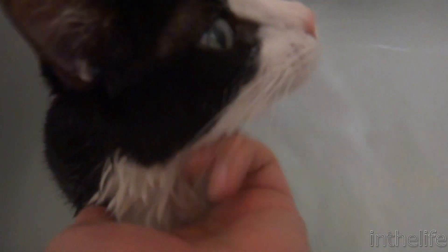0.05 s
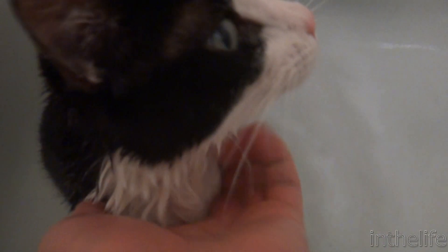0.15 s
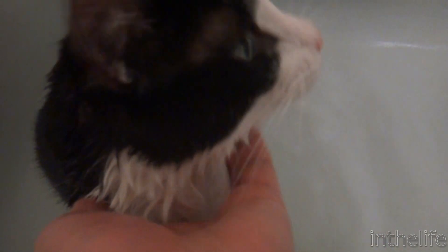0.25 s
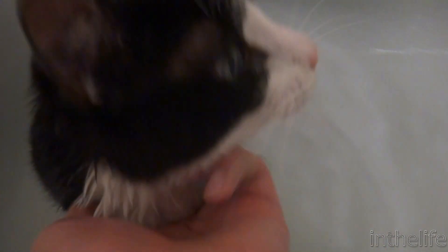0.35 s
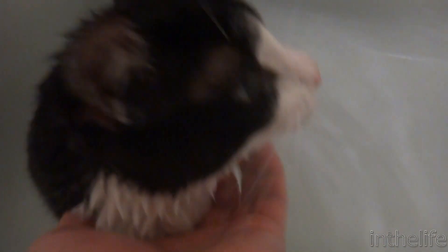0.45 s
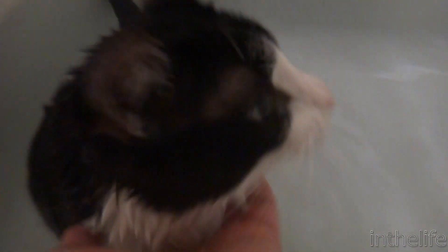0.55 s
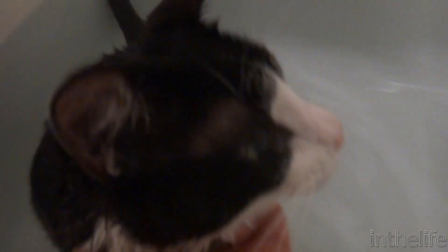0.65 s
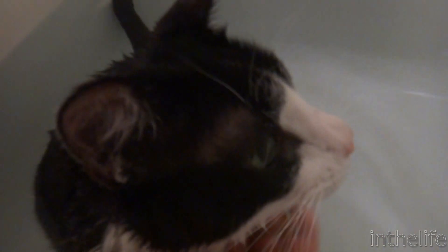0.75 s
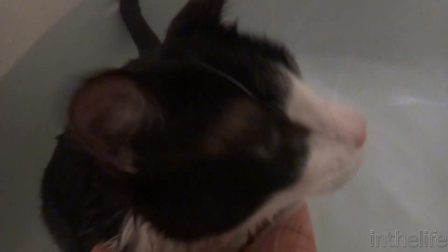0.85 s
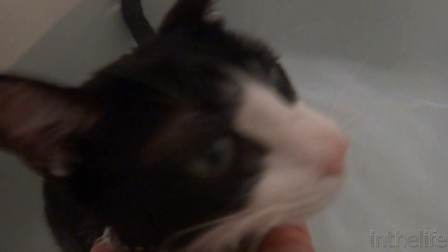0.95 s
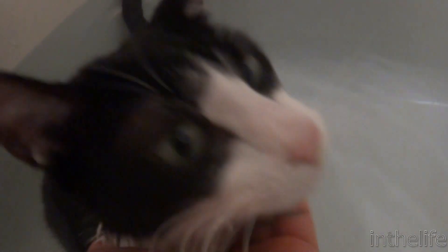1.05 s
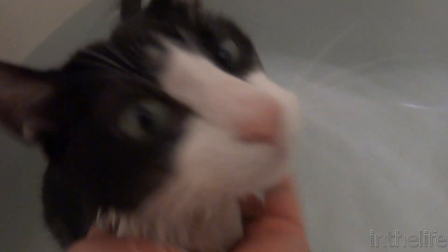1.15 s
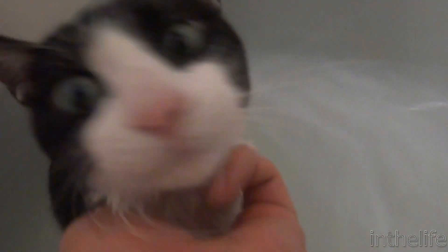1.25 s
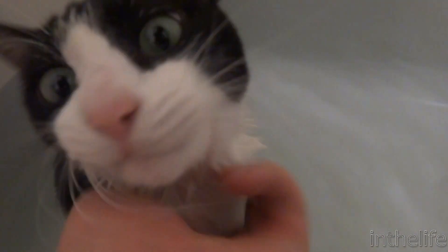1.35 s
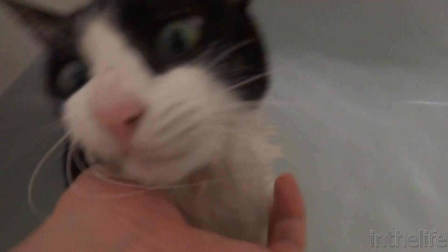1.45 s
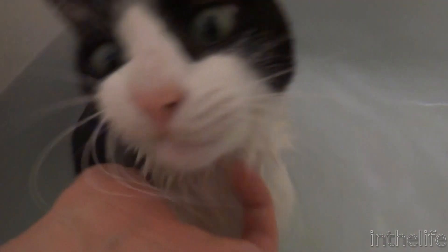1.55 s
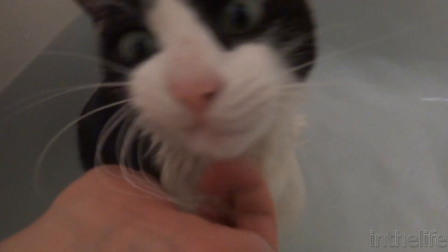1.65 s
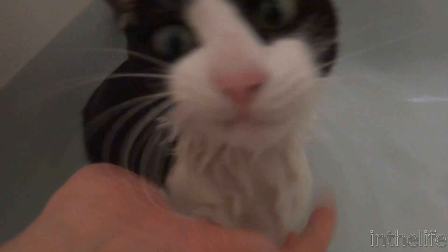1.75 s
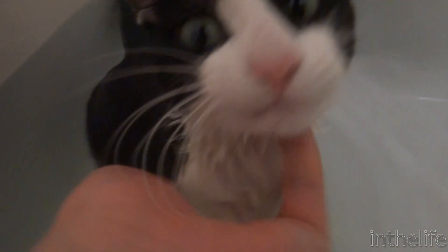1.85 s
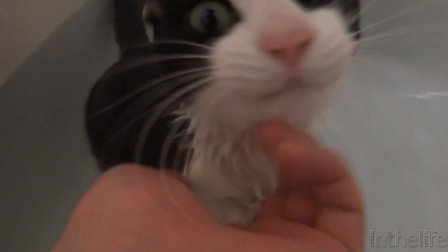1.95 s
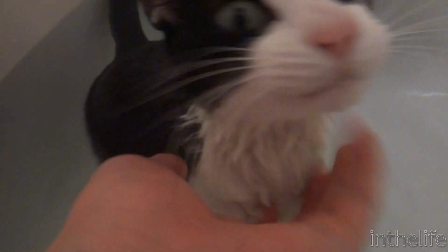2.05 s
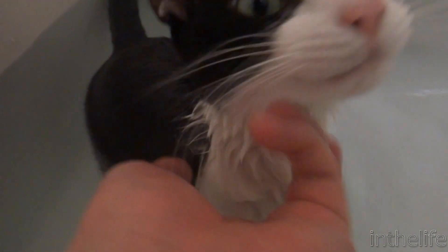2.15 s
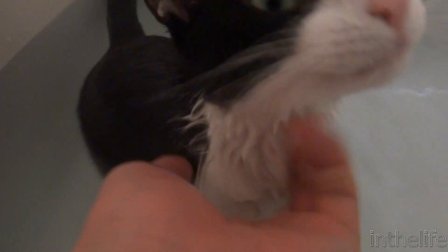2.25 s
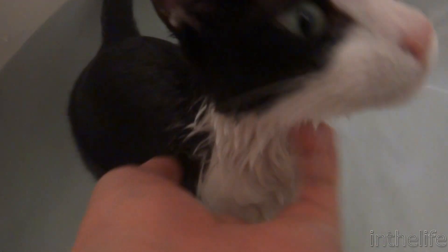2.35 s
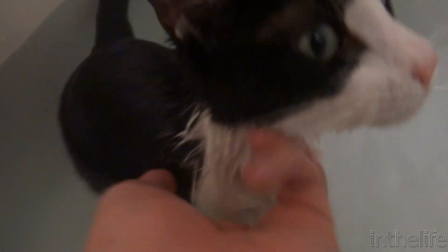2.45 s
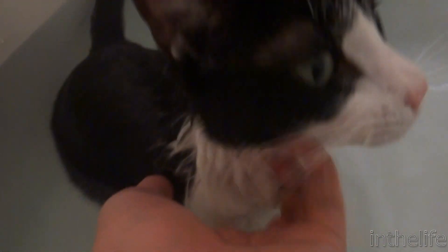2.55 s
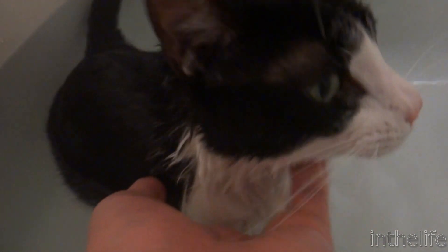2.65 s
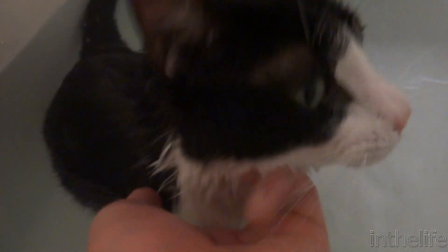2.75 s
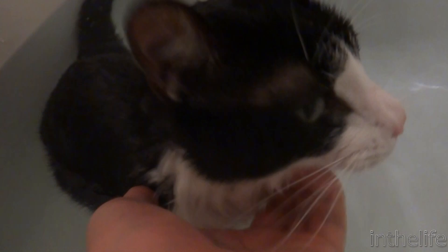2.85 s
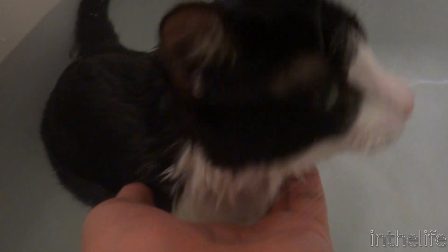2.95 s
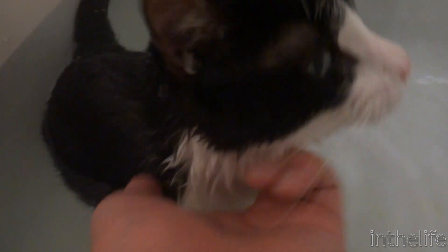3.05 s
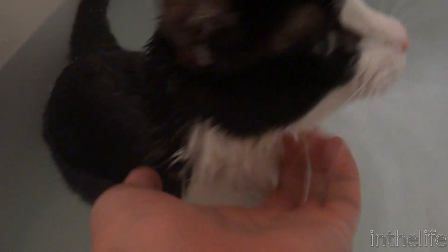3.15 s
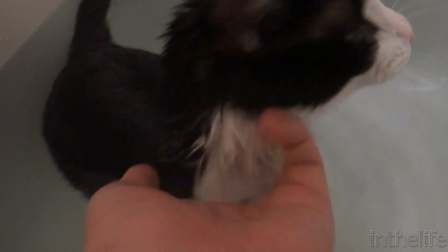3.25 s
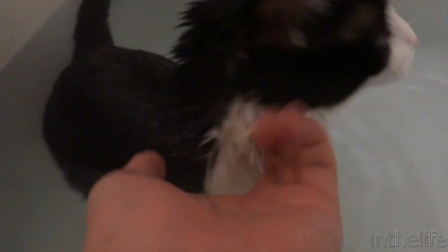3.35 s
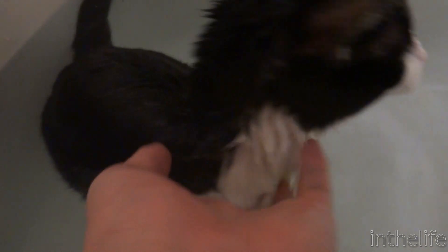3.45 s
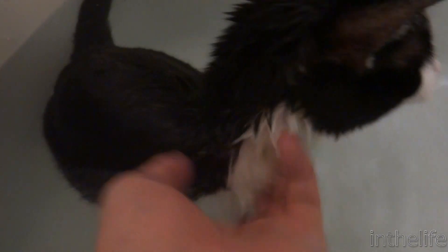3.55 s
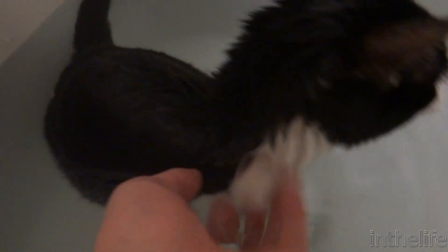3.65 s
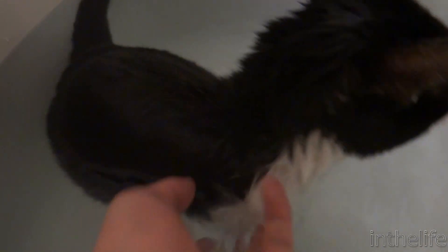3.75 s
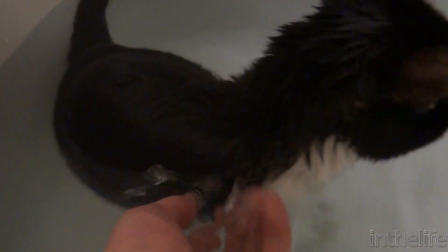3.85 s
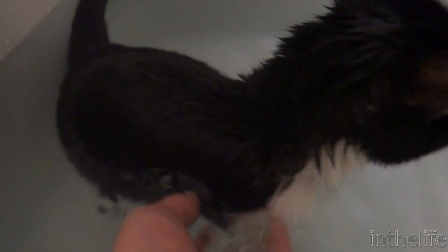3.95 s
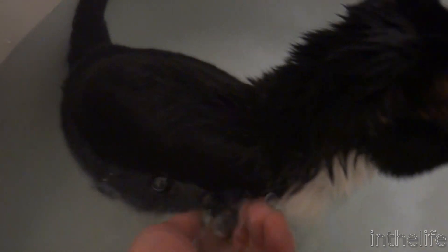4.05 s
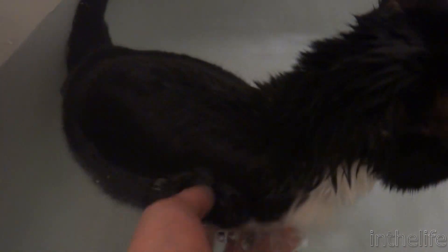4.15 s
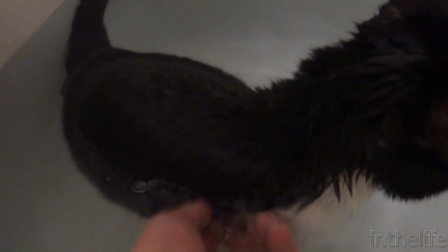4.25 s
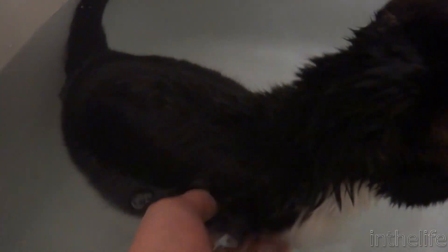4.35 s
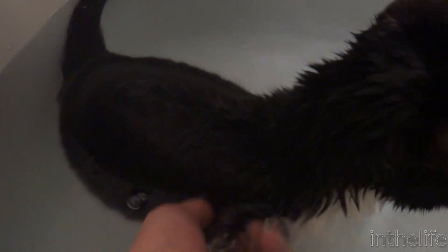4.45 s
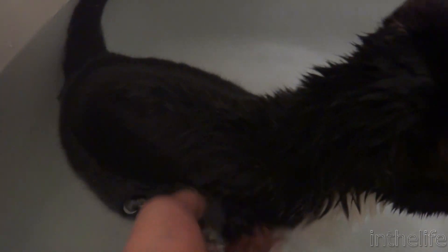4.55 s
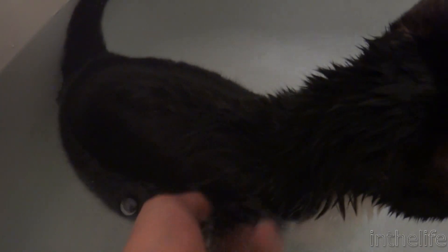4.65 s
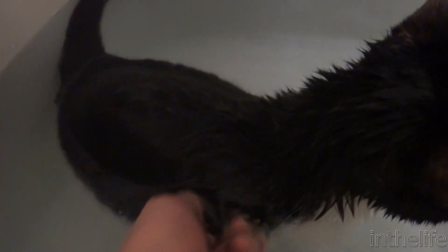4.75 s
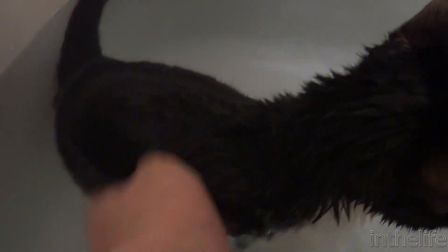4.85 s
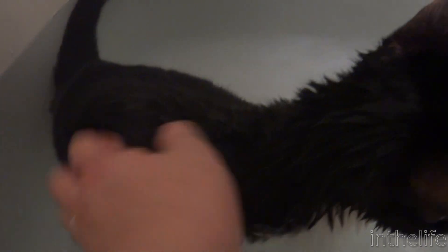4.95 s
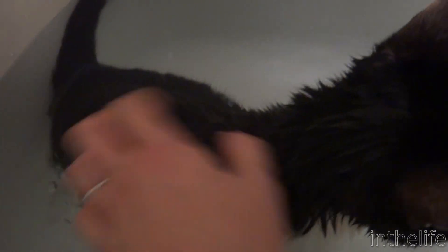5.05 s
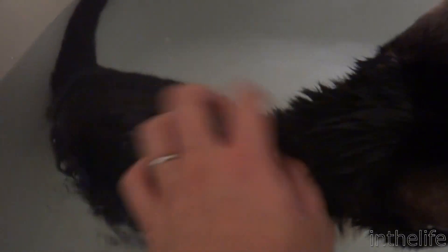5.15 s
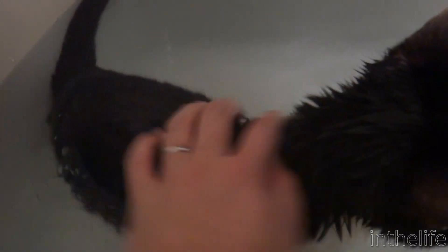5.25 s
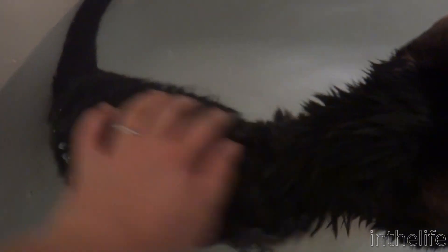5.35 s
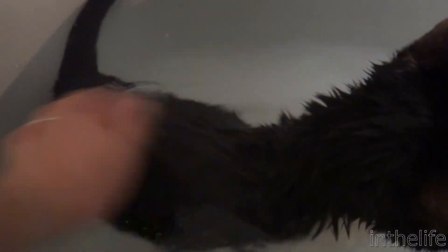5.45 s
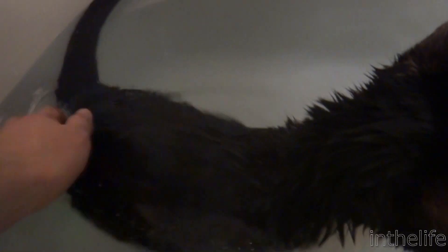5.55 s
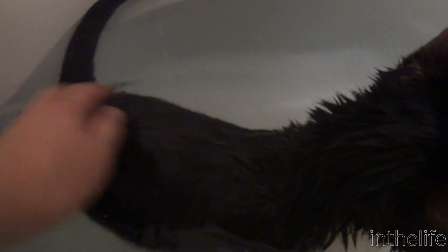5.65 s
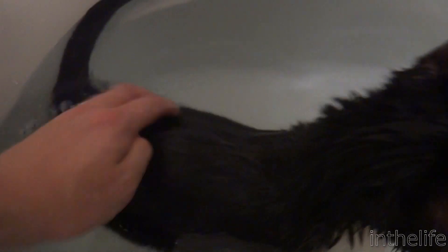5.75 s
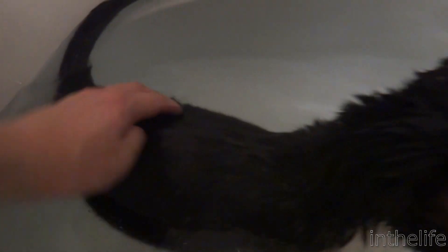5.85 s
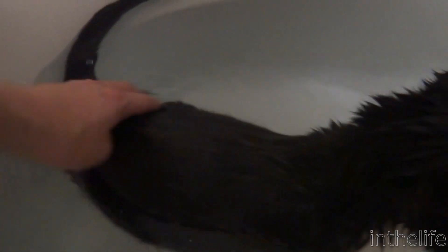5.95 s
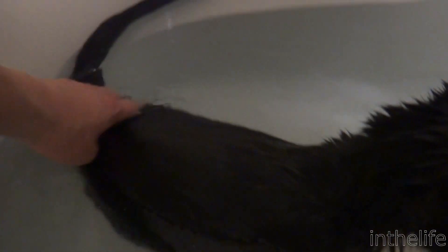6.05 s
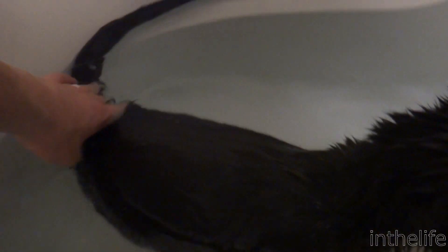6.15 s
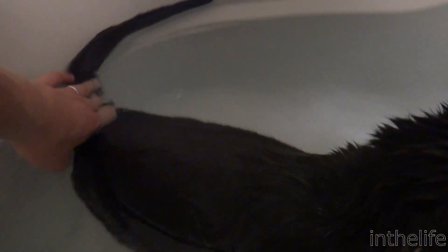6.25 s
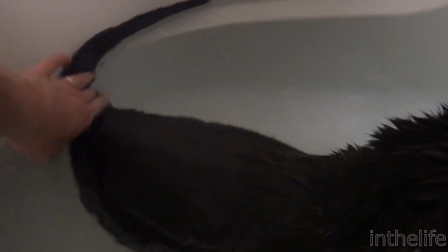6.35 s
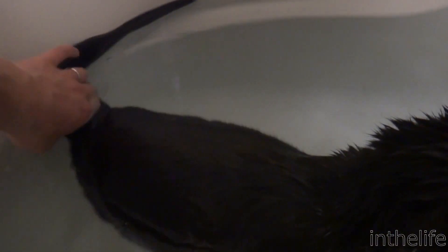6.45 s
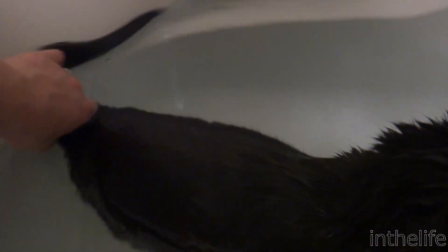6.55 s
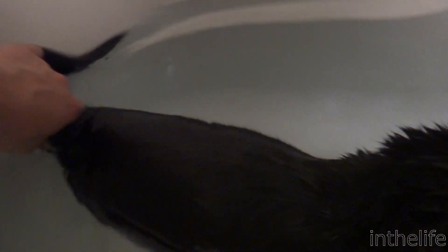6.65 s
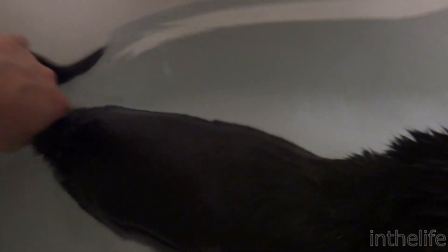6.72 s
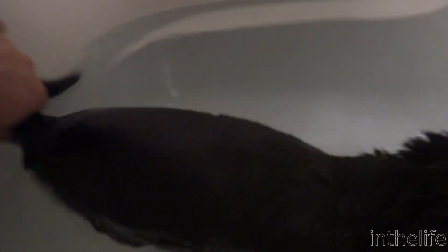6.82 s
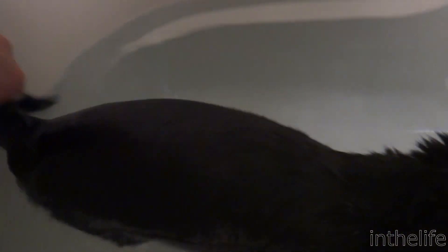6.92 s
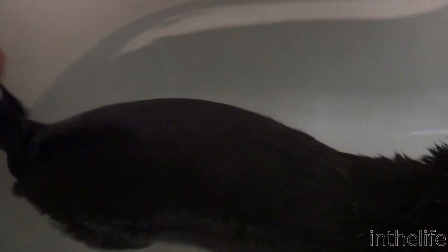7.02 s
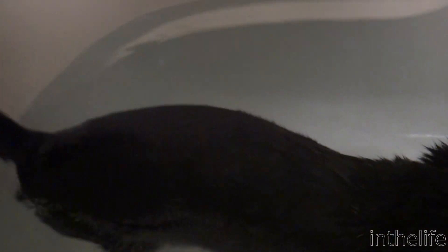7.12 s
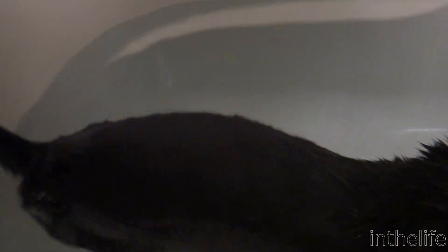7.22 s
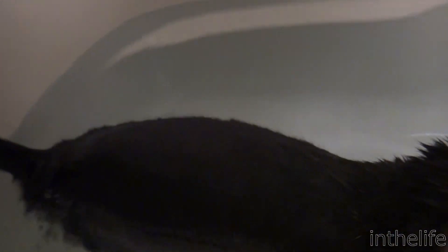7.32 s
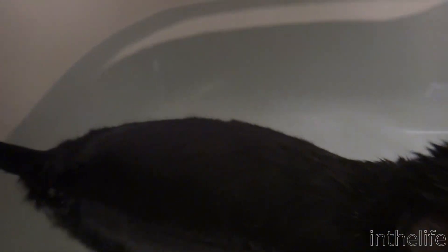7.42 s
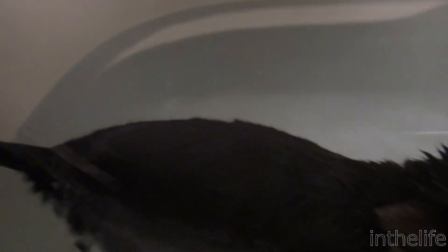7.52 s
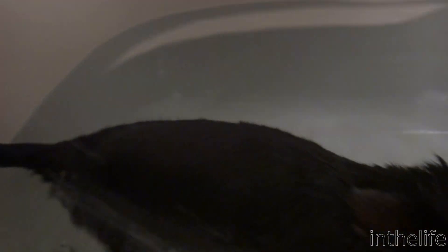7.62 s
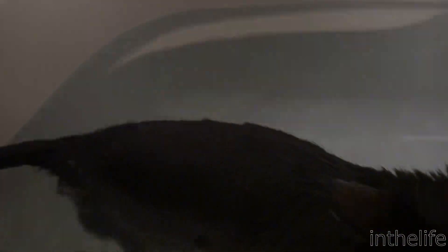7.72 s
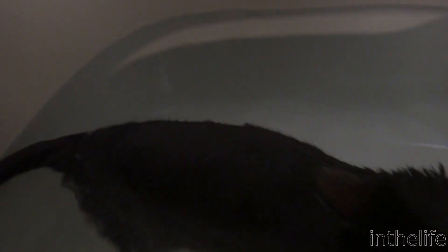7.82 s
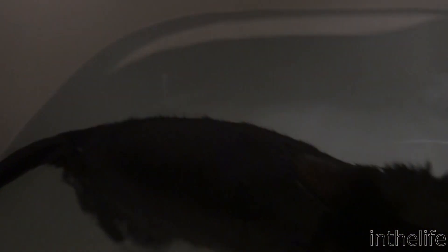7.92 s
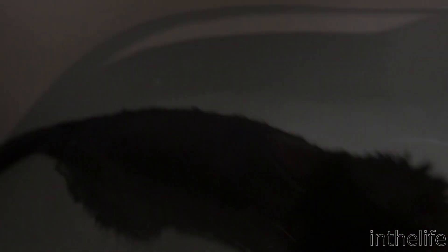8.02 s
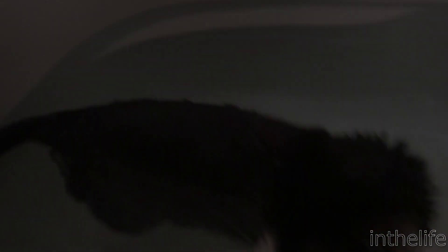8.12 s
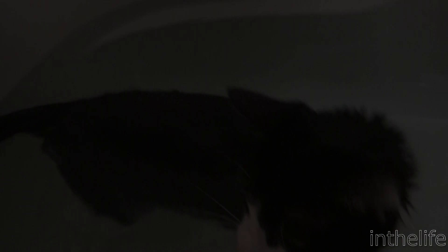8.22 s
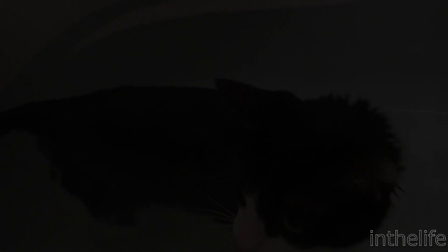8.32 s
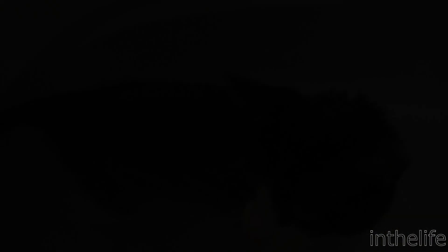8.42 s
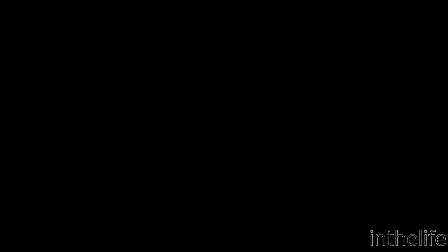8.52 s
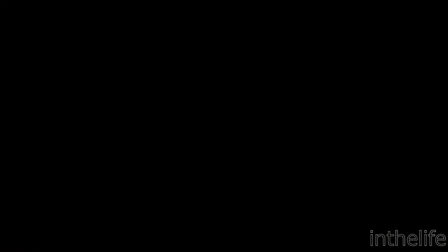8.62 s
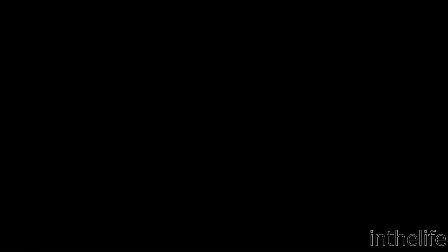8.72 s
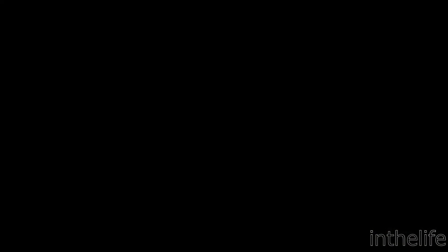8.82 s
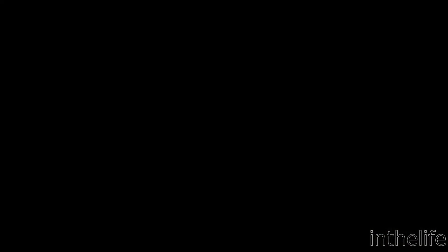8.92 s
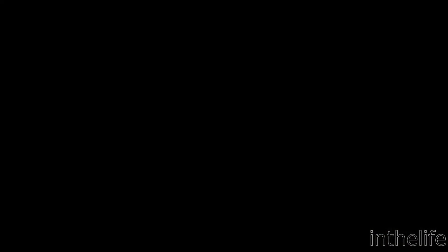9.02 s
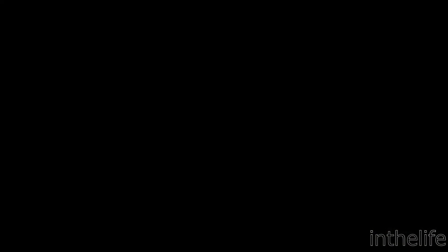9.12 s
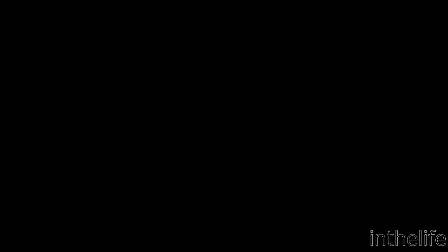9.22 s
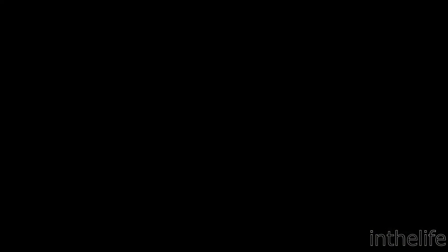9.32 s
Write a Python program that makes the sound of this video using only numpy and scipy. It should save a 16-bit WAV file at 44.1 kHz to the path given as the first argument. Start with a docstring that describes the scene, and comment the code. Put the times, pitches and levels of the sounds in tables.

```python
"""Drops from a cat's wet fur, stroked by a hand over a shallow bath, click and ring small bubbles in the hard tub.
Each drop is a filtered noise crack with a dying sine; fizz, scratches and splashes are clouds of tiny bubbles.
The hand-held camera adds motor whirr (noise through housing resonances), hiss, thin sine whines and grip thumps.
A tiled room of two close reflections and a sparse tail surrounds the water; everything fades to silence."""
import sys
import numpy as np
from scipy import signal
from scipy.io import wavfile
from scipy.ndimage import uniform_filter1d

SR = 44100
rng = np.random.default_rng(int(sys.argv[2]) if len(sys.argv) > 2 else 0)


def unload_audio(sound):
    """Save the sound as a 16-bit wav file, at the path given as the first command line argument."""
    columns = np.transpose(np.atleast_2d(sound))
    # keep every value between -1 and 1, then stretch to whole-number steps
    steps = np.round(np.clip(columns, -1, 1) * 32767)
    wavfile.write(sys.argv[1], SR, steps.astype(np.int16))


def magnitude_from_level(level_db):
    """Linear magnitude for a level in decibels (20 dB per decade)."""
    exponent = np.asarray(level_db, float) / 20
    return 10 ** exponent


N = 413658


def evened(x):
    """Scales a signal to rms 1."""
    return x / np.sqrt(np.mean(np.abs(x) ** 2) + 1e-20)


def read(points, hz):
    """Reads a (f/Hz, value) table on a log-frequency axis."""
    f, value = np.transpose(points)
    return np.interp(np.log(hz + 1), np.log(f + 1), value)


def add(mix, s, sound):
    """Mixes a sound in at time s, cut off where the mix ends."""
    part = mix[round(s * SR):][:len(sound)]
    part += sound[:len(part)]


def ports(mid, side):
    """Left and right microphone ports from their sum and difference signals."""
    return np.array([mid + side, mid - side])


def housing(modes, hz):
    """Magnitude response of a set of steep resonances whose powers add."""
    return np.sqrt(sum((magnitude_from_level(db) / (1 + (2 * (hz - f) / w) ** 2)) ** 2 for f, w, db in modes))


def camera():
    """One motor noise reaches both ports through the housing, over unrelated hiss and steady whines."""
    # housing resonances driven by the motor, in sum and difference: (f/Hz, width/Hz, relative level/dB)
    sum_modes = [(135, 83, -5.9), (310, 265, -7.3), (662, 148, -3.6), (911, 161, -1.3), (1313, 218, -1.8),
                 (1759, 571, -14.2), (2056, 357, -17.0), (2644, 417, -17.4), (3058, 517, -10.5),
                 (3309, 459, -13.0)]
    difference_modes = [(448, 174, -1.4), (641, 176, 1.4), (752, 131, 4.4), (987, 126, 6.6),
                        (1288, 223, -7.6), (1503, 180, -10.1), (1785, 261, -9.6), (2102, 577, -21.3),
                        (2732, 353, -19.7), (3070, 450, -19.4), (3331, 368, -17.2)]
    # phase lag of the difference behind the sum: (f/Hz, lag/rad)
    difference_lag = [(60, 2), (200, 1.8), (330, .3), (560, 1.5), (720, 1), (820, 1.8), (960, .7),
                      (1250, 2), (1500, 1), (1950, 1.8), (2600, .6), (2900, 1.4), (3300, .7), (4000, 0.94)]
    # room air and microphone hiss in sum and difference: (f/Hz, relative level/dB)
    hiss_sum = [(25, -9.5), (60, -12), (250, -31.5), (500, -14.5), (1100, -35.5), (2300, -49), (3800, -25),
                (5000, -28.5), (8000, -33.5), (12000, -30), (15700, -36.5)]
    hiss_difference = [(25, -45), (60, -40), (250, -19), (1200, -18), (2400, -29), (3800, -31),
                       (5000, -31.5), (8000, -35), (12000, -41), (15700, -55)]
    # hum and electronic whines: (f/Hz, rms level in the sum/dB)
    whines = [(120, -66), (150, -64), (6713, -80), (6745, -75), (6772, -75), (7165, -82), (7192, -76),
              (7311, -78), (7375, -73), (7434, -80), (12290, -82), (13458, -84), (13485, -80), (13517, -83),
              (15735, -79)]
    noise_db = -43.5  # rms of motor and hiss together in the sum
    shared = 0.9  # part of the motor's difference signal tied to the sum, 0-1

    # complex noise spectra, one frame every 512 samples
    frames, hz = N // 512 + 5, np.fft.rfftfreq(2048, 1 / SR)
    draw = rng.standard_normal((frames, 1025, 9)).T
    motor, other, air, air_side = draw[0:8:2] + 1j * draw[1:8:2]
    # the motor flutters by 1.3 dB rms, smoothly over neighbouring bins and frames
    flutter = evened(uniform_filter1d(uniform_filter1d(draw[8], 8, 0), 4, 1))
    motor = motor * magnitude_from_level(1.3 * flutter)

    mid = housing(sum_modes, hz)[:, None] * motor
    mid = mid + magnitude_from_level(read(hiss_sum, hz))[:, None] * air
    tied = shared * motor * np.exp(-1j * read(difference_lag, hz))[:, None]
    untied = np.sqrt(1 - shared ** 2) * other
    side = housing(difference_modes, hz)[:, None] * (tied + untied)
    side = side + magnitude_from_level(read(hiss_difference, hz))[:, None] * air_side
    mid, side = signal.istft(np.array([mid, side]), nperseg=2048, noverlap=1536)[1][:, :N]

    t = np.arange(N) / SR
    whine = sum(np.sqrt(2) * magnitude_from_level(db) * np.sin(2 * np.pi * (f * t + rng.random())) for f, db in whines)
    return magnitude_from_level(noise_db) * ports(mid, side) / np.std(mid) + ports(whine, 0.3 * whine)


def bubble(hz, t60, glide):
    """A dying sine whose pitch climbs (glide in octaves/s) as the bubble nears the surface."""
    t = np.arange(round(1.2 * t60 * SR) + 20) / SR
    # the climb stops after 0.35 of t60
    pitch = np.minimum(hz * 2 ** (glide * np.minimum(t, 0.35 * t60)), 16000)
    onset = 1 - np.exp(-t * hz / 0.5)  # swells over half a cycle
    return np.sin(2 * np.pi * np.cumsum(pitch) / SR) * magnitude_from_level(-60 * t / t60) * onset


def spray_levels():
    """Gains of high and of low droplets over time: fizz, scratches and splashes add in power."""
    # steady fizz of wet fur and draining water: (t/s, rms level of high droplets/dB)
    fizz_curve = [(0, -76), (1.4, -80), (1.9, -65.5), (2.1, -62.5), (3.0, -68.5), (3.4, -63.5), (4.1, -68),
                  (4.9, -71), (5.3, -71.5), (6.0, -57.5), (6.6, -63.5), (7.3, -62), (7.7, -88),
                  (8.4, -62.5)]
    # fingers scratching wet fur, short soft puffs: (t/s, peak rms level of high droplets/dB)
    scratches = [(.041, -54), (.154, -59), (.302, -50.5), (.415, -59), (.585, -54.5), (.765, -68),
                 (.881, -54), (1.23, -54), (1.44, -53.5), (1.596, -48.5), (2.202, -58), (2.299, -53),
                 (2.42, -58), (2.492, -54), (2.609, -53), (2.728, -50.5), (2.868, -59), (2.938, -57),
                 (3.02, -53), (3.2, -57), (3.31, -55), (3.665, -64), (7.197, -54), (8.479, -53)]
    # splashes that throw spray, rise and fall per 20 dB:
    # (t/s, peak rms level of high droplets/dB, rise/s, fall/s, weight of low droplets 0-1)
    splashes = [(1.752, -45.5, .12, 0.2, 0.1), (1.905, -58.5, .1, 0.1, 0), (3.457, -58, .2, .4, 0.6),
                (3.711, -45.5, .01, 0.098, 0.75), (3.859, -45, .03, 0.08, 0.8), (3.99, -55.5, .3, 0.46, 1),
                (4.32, -57.5, .3, .2, 0.2), (4.4, -58, .05, .9, 1), (4.724, -53, .1, 0.11, .94),
                (4.941, -53.5, .14, 0.39, 0.3), (5.094, -60, .3, 0.12, 0), (5.456, -52.5, .4, 0.061, 0.2),
                (5.503, -38, 0.014, 0.14, 0.9), (5.602, -36.5, 0.024, 0.17, 0.48),
                (5.68, -52.5, .1, .3, 0.8), (7.032, -56.5, .25, 0.14, .95), (7.47, -47.5, 0.025, 0.22, 0.2),
                (7.66, -41.5, .005, 0.14, 0), (7.785, -40, .03, 0.63, .36), (7.844, -45, .2, 0.8, .95),
                (7.964, -43.5, .15, 0.32, 1)]
    fizz_low = 0.37  # weight of low droplets in fizz and scratches, 0-1
    scratch_rise_s, scratch_fall_s = 0.03, 0.045  # time to climb and to lose 20 dB

    t = np.arange(0, N, 32) / SR
    bursts = splashes + [(s, db, scratch_rise_s, scratch_fall_s, fizz_low) for s, db in scratches]
    s, db, rise, fall, low = np.transpose(bursts)[:, :, None]
    power = magnitude_from_level(db - 20 * np.maximum((s - t) / rise, (t - s) / fall)) ** 2
    fizz = magnitude_from_level(np.interp(t, *np.transpose(fizz_curve))) ** 2
    high_power = power.sum(0) + fizz
    low_power = (low ** 2 * power).sum(0) + fizz_low ** 2 * fizz
    return [np.interp(np.arange(N) / SR, t, np.sqrt(p)) for p in (high_power, low_power)]


def spray():
    """Countless tiny droplets: short bubbles of random loudness and pitch, in a low and a high layer."""
    per_s, spread_db, cycles = 5000, 3.4, 32  # droplets per second, loudness spread, cycles per t60
    high_gain, low_gain = spray_levels()
    loudness = magnitude_from_level(spread_db * np.minimum(rng.exponential(1, N), 4))
    hits = loudness * (rng.random(N) < per_s / SR)
    kind, layers = rng.integers(0, 40, N), np.zeros((2, N))
    for k, hz in enumerate(np.geomspace(1900, 14000, num=40)):
        ringing = signal.oaconvolve(hits * (kind == k), bubble(hz, cycles / hz, 31))[:N]
        layers[int(hz > 5000)] += ringing
    # the low layer is lifted by 1.95 over its weights
    return 1.95 * low_gain * evened(layers[0]) + high_gain * evened(layers[1])


def drops():
    """Each drop: a sub-millisecond click, then a short ring; further bubbles have their own decay and glide."""
    # drops at the water, ahead of the room: (t/s, ring peak level/dB, ring f/Hz, click peak level/dB)
    drop_table = [(0.146, -40, 10000, -42), (0.3043, -40, 6660, -44), (0.762, -38, 8000, -39),
                  (1.7436, -27, 3930, -15.5), (1.7581, -17, 9600, -13), (1.8142, -29.5, 4040, -23),
                  (1.892, -16, 5670, -28), (2.017, -31.5, 5430, -25), (2.1956, -38, 6590, -27),
                  (2.9314, -32, 4740, -26), (3.4223, -20, 2300, -20), (3.4238, -32, 2430, -26),
                  (3.448, -20, 2880, -13), (3.4504, -15.5, 2690, -22), (3.6584, -26, 11700, -24.5),
                  (3.7053, -23, 5230, -5.5), (3.7369, -19, 5000, -39), (3.7408, -11.5, 2510, -8),
                  (3.8055, -24.5, 3300, -44.5), (3.8279, -17.5, 1960, -24), (3.8528, -26, 8100, -22.5),
                  (3.8591, -19, 3300, -19.5), (3.8648, -28, 13500, -40), (3.9291, -22, 4040, -49.5),
                  (3.934, -17, 1980, -19.5), (3.964, -23, 4530, -11.5), (3.9669, -13, 3080, -15.5),
                  (3.9943, -21.5, 3380, -38.5), (4.0367, -24, 3500, -36), (4.0458, -25.5, 9930, -31),
                  (4.127, -32, 8700, -29), (4.1615, -16.5, 920, -13), (4.188, -24, 11100, -33.5),
                  (4.2064, -17, 14480, -15.5), (4.219, -19, 11600, -26.5), (4.294, -28, 8000, -20.5),
                  (4.3372, -20, 2180, -19.5), (4.355, -7, 4660, -8.5), (4.4628, -24.5, 6400, -32),
                  (4.507, -30.5, 5700, -32.5), (4.5698, -35, 10000, -30), (4.6139, -35, 8260, -38),
                  (4.7067, -29.5, 7140, -41.5), (4.7256, -23, 2510, -23), (4.8622, -33, 8600, -40),
                  (4.872, -35, 9500, -33), (4.9101, -25.5, 1500, -21), (4.936, -21.5, 10000, -24),
                  (5.0164, -30.5, 4770, -31), (5.079, -32, 5500, -47), (5.086, -18.5, 12500, -34),
                  (5.2772, -30, 13100, -42.5), (5.4673, -7, 9700, -36.5), (5.474, -26, 6000, -36),
                  (5.477, -12.5, 10900, -16), (5.4997, -19, 7000, -23), (5.5032, -22, 1760, -35),
                  (5.513, -18.5, 3800, -40), (5.5262, -20, 4700, -38), (5.53, -24, 2670, -25.5),
                  (5.549, -25, 3800, -40), (5.598, -27, 10800, -28), (5.6084, -18, 5500, -31),
                  (5.653, -29, 10000, -15), (5.678, -24, 6390, -21), (5.804, -35, 4380, -46),
                  (5.813, -26.5, 10700, -40), (5.913, -32, 11900, -44), (5.933, -37, 4680, -37),
                  (5.9844, -26, 2800, -29), (6.072, -32, 12080, -42), (6.908, -32, 12800, -46),
                  (6.98, -37, 6500, -38), (7.197, -34, 9000, -42.5), (7.226, -32.5, 2600, -40),
                  (7.439, -31, 5630, -38), (7.4673, -23.5, 10700, -25.5), (7.5523, -23, 6800, -23.5),
                  (7.6627, -19.5, 4500, -20.5), (7.6654, -16.5, 7250, -36.5), (7.7808, -11, 3040, -8.5),
                  (7.795, -32, 7040, -14), (7.838, -26, 7100, -20), (7.8392, -18, 2440, -9),
                  (7.8466, -15.5, 3660, -33), (7.852, -16.5, 4220, -22), (7.8695, -24.5, 940, -14.5),
                  (7.9051, -15, 10500, -21), (7.9195, -22, 11070, -26.5), (7.9388, -25, 4500, -34),
                  (7.9473, -16, 4400, -7), (7.9478, -19, 2600, -40), (7.953, -20, 14000, -35),
                  (7.961, -12, 9500, -25.5), (7.9696, -24, 2580, -28), (7.9809, -23, 9590, -24),
                  (7.9943, -22, 9200, -23), (8.003, -14, 5630, -19), (8.0421, -9.5, 12800, -24.5),
                  (8.0711, -10.5, 2900, -13), (8.096, -28, 4060, -42), (8.1313, -24, 3140, -25),
                  (8.179, -16.5, 6850, -15), (8.2118, -27, 10100, -42), (8.2427, -31, 11200, -42),
                  (8.4296, -15.5, 12600, -43), (8.4599, -21, 12880, -40), (8.489, -20, 11900, -33)]
    # bubbles with their own ring time and glide, some sounding together with a drop's click:
    # (t/s, peak level/dB, f/Hz, t60/s, upward glide/(octaves/s))
    bubble_table = [(1.683, -33, 2060, .04, 1), (2.01, -35, 1370, 0.015, 1), (3.6731, -31, 2080, .03, 1),
                    (3.7052, -23.5, 2160, 0.0081, 1), (3.7124, -27, 1560, 0.013, 1),
                    (3.744, -23, 1000, 0.033, 1), (3.959, -27, 3800, 0.0084, 210),
                    (3.9637, -10, 2016, .027, 1), (4.1528, -26.5, 2140, .013, 1),
                    (4.173, -14.5, 975, 0.025, 3.6), (4.184, -25, 1110, 0.044, 3),
                    (4.187, -31, 870, 0.036, 1), (4.19, -29, 1245, .04, 34),
                    (4.2075, -21.5, 2950, 0.011, 190), (4.563, -29, 749, .09, 3.7),
                    (4.628, -29.5, 1000, 0.12, 36), (4.7223, -30, 2210, 0.031, 22),
                    (4.9231, -31, 2300, 0.018, 1), (4.961, -29, 2700, 0.021, 1),
                    (4.3553, -42, 4670, 0.22, 0.041), (5.503, -29, 4420, .04, 1),
                    (5.512, -28.5, 870, 0.037, 1), (5.5845, -29, 2540, 0.016, 31),
                    (5.5977, -23.5, 2880, 0.021, 99), (5.616, -29, 4280, 0.071, .2),
                    (5.6269, -27, 1660, 0.027, 1), (5.6824, -23, 2280, .018, 23),
                    (5.693, -36, 2400, 0.18, .05), (5.972, -46, 10900, 0.23, .05),
                    (7.6621, -18.5, 3020, 0.011, 19), (7.781, -16, 3960, 0.011, 1),
                    (7.794, -22, 2600, 0.018, 1), (7.858, -25, 2497, .03, 1),
                    (7.8695, -20, 485, 0.065, 2.1), (7.95, -34, 628, 0.081, 1), (7.884, -29, 1030, 0.02, 1),
                    (7.92, -27.5, 2500, 0.02, 1), (8.0747, -8.5, 2800, 0.013, 69),
                    (8.074, -20, 4440, 0.0092, 1)]
    ring_s, ring_hz, ring_slope = 0.0048, 5000, 0.67  # t60 at ring_hz; higher drops die sooner

    out, t = np.zeros(N), np.arange(32) / SR
    cracks = 0.25 * rng.standard_normal((len(drop_table), 32)) * np.exp(-t / 0.00015)
    cracks[:, 0] = -1  # a clean snap with a little splinter behind it
    cracks = signal.lfilter([1, 0.3, -1.3], [1, -0.45], cracks)  # no bass, soft top
    for (s, db, hz, click_db), crack in zip(drop_table, cracks):
        ring = bubble(hz, ring_s * (ring_hz / hz) ** ring_slope, 0)
        add(out, s, magnitude_from_level(db) * ring / abs(ring).max())
        add(out, s, magnitude_from_level(click_db) * crack / abs(crack).max())
    for s, db, hz, t60, glide in bubble_table:
        ring = bubble(hz, t60, glide)
        add(out, s, magnitude_from_level(db) * ring / abs(ring).max())
    return out


def thumps():
    """A finger shifts on the camera body: one low push, its rebound, and a short knock of the shell."""
    # grip thumps: (t/s, push peak level in the sum/dB, push f/Hz, knock gain/dB)
    thump_table = [(0.868, -43, 160, -46), (1.399, -39, 200, -42), (3.077, -37, 90.5, -50),
                   (3.882, -31, 88, -50), (5.0961, -31, 125, -50), (6.0267, -32.5, 170, -22),
                   (7.619, -30.5, 190, -48)]
    out = np.zeros(N)
    for s, db, hz, knock_db in thump_table:
        u = np.arange(round(1.3 * SR / hz)) * hz / SR  # time in cycles
        push = -np.sin(2 * np.pi * u) * np.sqrt(np.sin(np.pi * u / 1.3))
        add(out, s, magnitude_from_level(db) * push / abs(push).max())
        add(out, s, -magnitude_from_level(knock_db) * bubble(1200, 0.006, 0))
    return ports(out, 0.045 * out)


def bathroom(x):
    """Direct sound, two close reflections, and a sparse tail whose bands die at their own speed."""
    # tub and tiles: (f/Hz, t60/s, relative level/dB)
    tiles = [(400, 0.39, 3), (1000, 0.5, -1.5), (2500, 0.19, 1.1), (5000, 0.25, -1), (10000, .25, -2.5)]
    # early reflections off water, tub wall and rim: (delay/s, gain)
    walls = [(.0032, 0.067), (0.0135, 0.033)]
    tail_db, tail_width = -7.5, 0.4  # tail energy in the sum against the direct sound; difference gain

    # one tap of random sign in every 20 samples
    taps = np.zeros((2, SR // 2))
    at = np.arange(120, SR // 2 - 20, 20)
    places = at + rng.integers(0, 20, (2, len(at)))
    np.put_along_axis(taps, places, rng.choice([-1., 1.], (2, len(at))), 1)
    hz, t, z = signal.stft(taps, SR, nperseg=256)
    t60, db = (read([(row[0], row[k]) for row in tiles], hz)[:, None] for k in (1, 2))
    tail = signal.istft(z * magnitude_from_level(db - 60 * t / t60), SR, nperseg=256)[1]
    tail = magnitude_from_level(tail_db) * ports(tail[0], tail_width * tail[1]) / np.linalg.norm(tail[0])

    near = np.zeros(tail.shape[1])
    near[0] = 1
    for delay, gain in walls:
        near[round(delay * SR)] = gain
    balance = magnitude_from_level([[0.4], [-0.4]])  # slightly left
    return signal.fftconvolve(x[None], tail + near * balance, axes=1)[:, :N]


def scene():
    """Water in the room, dulled at the top by the microphone cover; camera noises close by."""
    cover = signal.butter(2, 11500, fs=SR, output="sos")
    water = signal.sosfilt(cover, drops() + spray())
    return bathroom(water) + thumps() + camera()


def band_limit(x):
    """A steep low-pass at the top of the band."""
    return signal.sosfilt(signal.butter(12, 16830, fs=SR, output="sos"), x)


def record(dry):
    """A steep treble limit, then a fade to silence."""
    edge_hz = 15830
    fade_start_s, fade_end_s, fade_power = 7.735, 8.542, 1.23
    lowpass = signal.firwin(801, edge_hz, window=("kaiser", 8), fs=SR)
    limited = signal.oaconvolve(dry, lowpass[None], "same")
    left = np.clip((fade_end_s - np.arange(N) / SR) / (fade_end_s - fade_start_s), 0, 1)  # fade remaining
    return band_limit(limited * left ** fade_power)


dry = scene()
out = record(dry)
unload_audio(out)
```